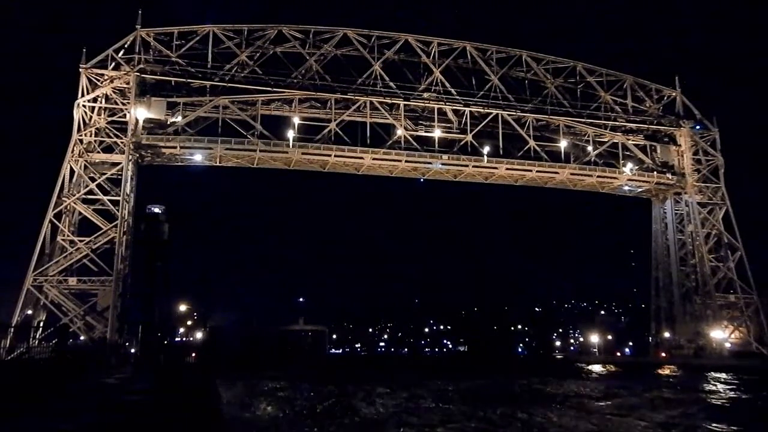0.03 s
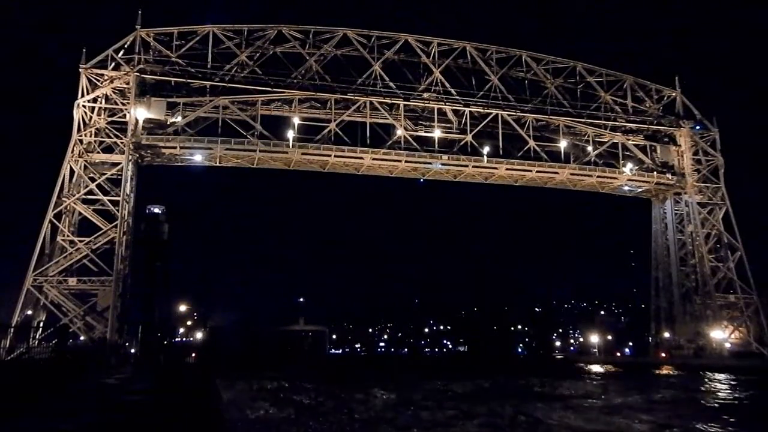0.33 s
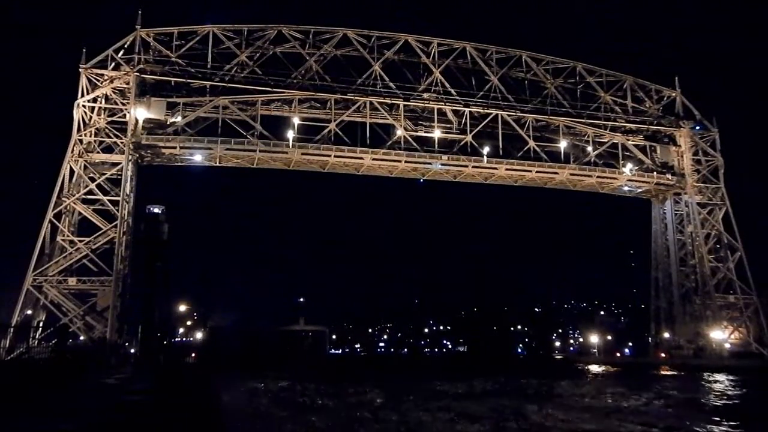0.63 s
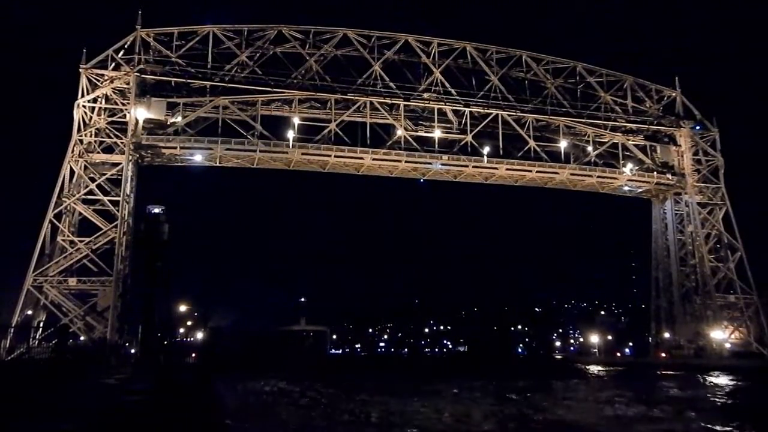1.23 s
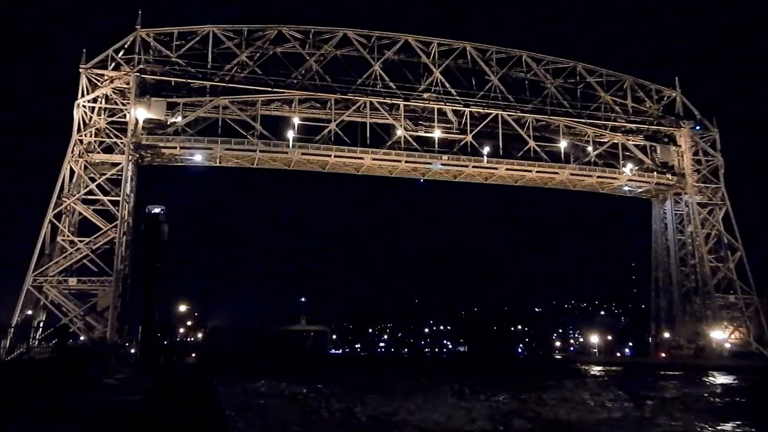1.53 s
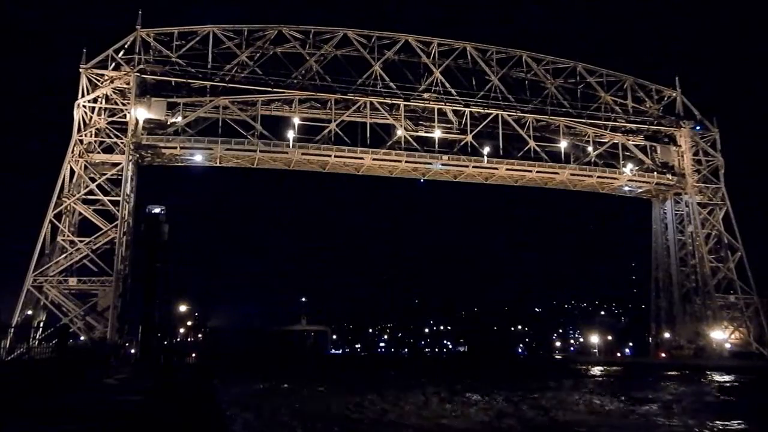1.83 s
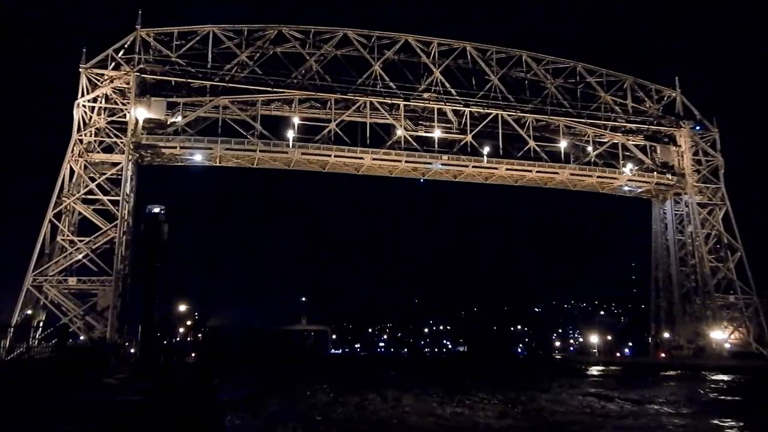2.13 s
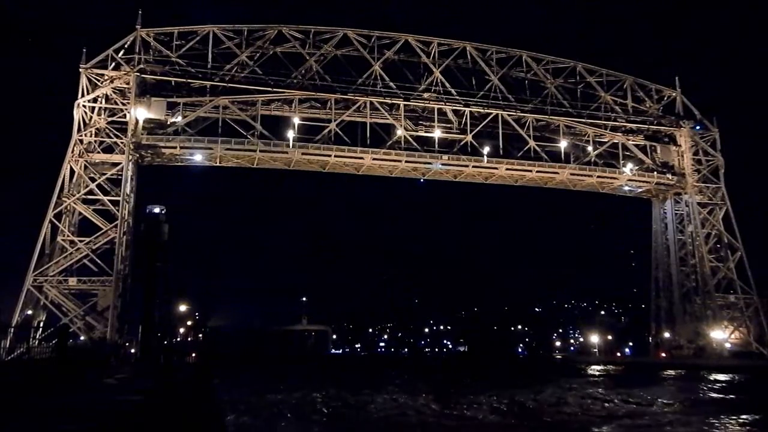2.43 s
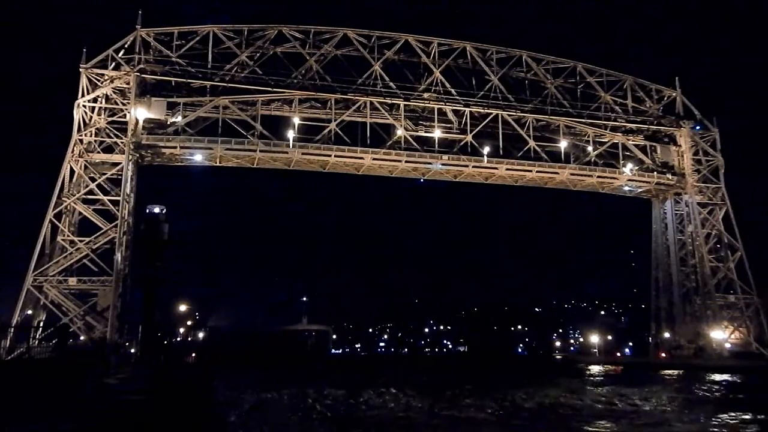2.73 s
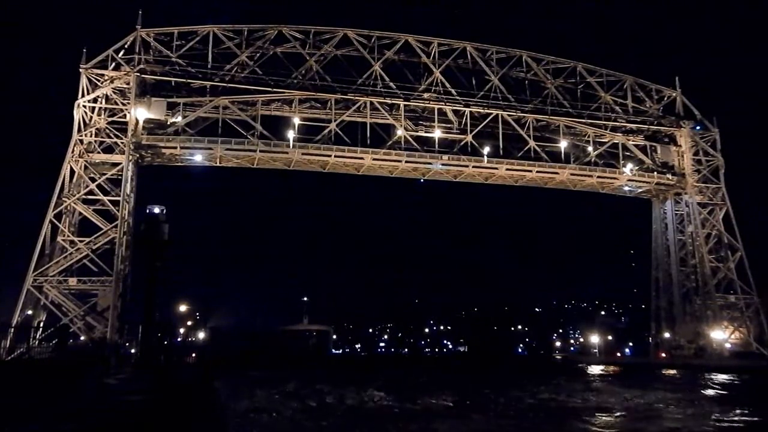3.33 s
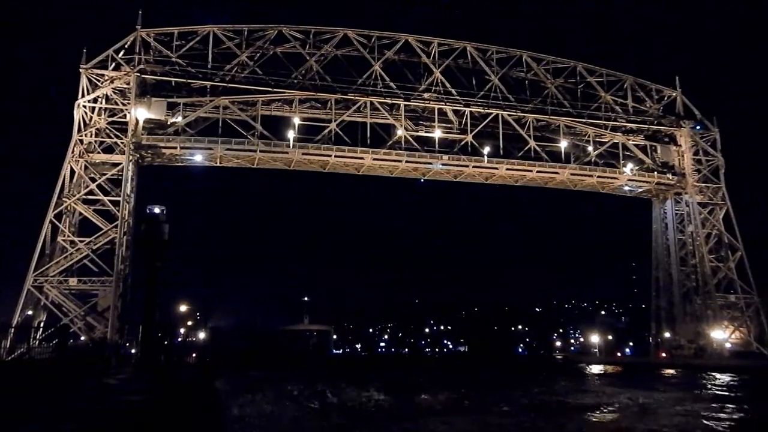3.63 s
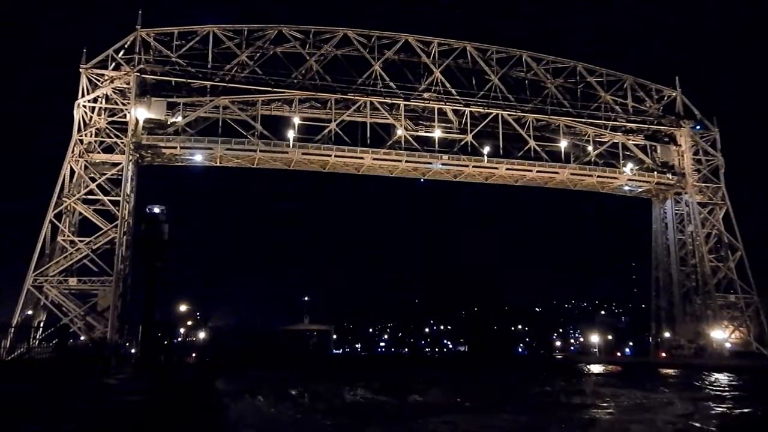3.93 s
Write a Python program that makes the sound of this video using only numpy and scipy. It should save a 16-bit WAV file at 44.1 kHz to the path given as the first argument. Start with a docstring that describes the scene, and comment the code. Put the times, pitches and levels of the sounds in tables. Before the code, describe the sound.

A ship's low, brassy horn stops, echoes over washing harbour water, and sounds again.

```python
"""A ship's deep horn is already blowing over a harbour at night, with engines rumbling underneath.
Its sound arrives by several shifting paths, so its overtones swell and fade, and the shore echoes it.
At 2.7 seconds the horn stops, and a few of its tones come back late from across the water.
In the pause, water washes and slaps against the pier and throws up light spray.
Just before the end, at 3.8 seconds, the horn starts again."""
import sys
import numpy as np
from scipy import signal
from scipy.fft import rfft, irfft
from scipy.io import wavfile
from scipy.ndimage import uniform_filter1d, minimum_filter1d

SR = 44100
rng = np.random.default_rng(int(sys.argv[2]) if len(sys.argv) > 2 else 0)


def wav_record(signal):
    """Record a signal, one row per channel, as 16-bit PCM in the file named by sys.argv[1]."""
    frames = np.transpose(np.atleast_2d(signal))
    bounded = np.clip(frames, -1, 1)
    # unit amplitude maps onto the largest positive 16-bit level
    quanta = np.round(bounded * 32767).astype(np.int16)
    wavfile.write(sys.argv[1], SR, quanta)


N = 176400  # 4 seconds
TIME = np.arange(N) / SR


def amp(db):
    """Turns decibels into a number to multiply by."""
    return 10 ** (np.asarray(db) / 20)


def unit(x):
    """Scales a signal so that its average power is 1."""
    return x / np.sqrt(np.mean(abs(x) ** 2) + 1e-20)


def at_frequency(points, hz):
    """Looks up a frequency in a table, blending between rows on a logarithmic scale."""
    row_hz, value = np.transpose(points)
    return np.interp(np.log(hz + 1), np.log(row_hz), value)


def loudness(points):
    """Turns rows of seconds and dB into a gain for every sample."""
    return amp(np.interp(TIME, *np.transpose(points)))


def drift(per_s, size=2048):
    """A smooth random wobble, with up to about per_s swings a second."""
    hz = np.fft.rfftfreq(size, 2 * N / SR / size)
    slow = irfft(rfft(rng.standard_normal(size)) / np.sqrt(1 + (hz / per_s) ** 6))
    return np.interp(np.arange(N) * size / (2 * N), np.arange(size), unit(slow))


# Each row: frequency in Hz, how alike left and right are (1 means the same).
STEREO_LIKENESS = [(60, 0.81), (500, 0.87), (1800, 0.98), (3000, 0.71), (12000, 0.45)]


def noise(spectrum):
    """Stereo noise shaped by rows of Hz and dB, mostly alike in both ears."""
    hz = np.fft.rfftfreq(N, 1 / SR)
    left, other = rfft(rng.standard_normal((2, N)))
    alike = np.clip(at_frequency(STEREO_LIKENESS, hz), -1, 1)
    right = alike * left + np.sqrt(1 - alike ** 2) * other
    return unit(irfft(np.array([left, right]) * amp(at_frequency(spectrum, hz)), N))


HORN_HZ = 93.63  # the horn's note; its harmonics are whole multiples of this
# Harmonics 2 to 15. Each row: middle level in the first blast in dB, swing in dB, time of a crest in
# seconds, seconds between crests, strength of a second path from 0 to 1, a time when that path cancels
# most in seconds, seconds between such dips, level in the second blast in dB.
LOW_HARMONICS = [(-17.3, 4.5, 2.38, 5.4, .25, 1.5, 1.26, -28), (-14.9, 7.5, .6, 5.9, .08, 2.55, .56, -12),
                 (-19, 4.2, 2.59, 3.8, .22, 1.79, 1.1, -17), (-23.5, 10, .35, 2.75, .2, 1.55, 1.3, -28),
                 (-26, 6.5, 2.55, 3.6, .25, 1.5, 1.2, -25.5), (-29, 3, .7, 3.5, .55, 1.45, .85, -26),
                 (-31, 5.6, 1.03, 1.31, .75, 1.19, 1.04, -29), (-27.5, 5.9, 2.21, 2.95, .4, 1.35, .47, -13),
                 (-28.8, 4, 2.5, 3.6, .78, 1.39, .5, -22.5), (-28.8, 5.6, 1.09, 1.32, .43, 1.23, .9, -27),
                 (-27.6, 5.7, 1.9, 2.01, .78, 1.06, .42, -23), (-25.3, 2.5, 2.4, 2.2, .7, 1.47, 1.15, -20),
                 (-30, 2.5, 2.6, 3, .65, 1.3, .335, -23), (-29, 3, 2.1, 3.85, .4, 1.14, .49, -31)]
# The brassy harmonics above those. Each row: frequency in Hz, dB added to the treble level.
TREBLE_SPECTRUM = [(1300, -6.5), (1700, -8), (2000, -7.5), (2300, -10.5), (2650, -18.5), (3000, -19),
                   (3400, -26), (3800, -26), (4300, -41), (4800, -37.5), (5500, -50.5), (6500, -58.5)]
# How loud that treble is. Each row: time in seconds, level in dB.
TREBLE_LEVEL = [(0, -24), (.44, -23), (.87, -24), (.96, -20), (1.02, -23.5), (1.5, -21.5), (1.8, -21),
                (2.03, -19), (2.15, -21), (2.45, -19), (2.7, -18.5), (3.82, -22.5), (3.87, -19.5),
                (3.9, -13.5), (4, -19)]
# Brief swells and fades of one band. Each row: time in seconds, frequency in Hz, change in dB,
# half-length in seconds.
SURGES = [(.06, 2890, 6, .06), (1.5, 2950, 3.5, .13), (1.46, 1130, -7, .06), (1.46, 490, -8, .08),
          (1.68, 1955, 5, .12), (2.27, 1840, 6, .056), (2.47, 1340, 7, .08), (3.83, 470, 4, .04),
          (3.83, 3100, 7, .03)]
SURGE_WIDTH_HZ = 156


def harmonic_strength(t, treble, bright_db, first_blast, harmonic):
    """Strength of one harmonic; in the first blast, low overtones swell and beat with a second path."""
    if harmonic == 1:
        return amp(-31)
    hz = harmonic * HORN_HZ
    surge_db = sum(db * np.exp(-((hz - band_hz) / SURGE_WIDTH_HZ) ** 2 - ((t - when) / length) ** 2)
                   for when, band_hz, db, length in SURGES if abs(hz - band_hz) < 2 * SURGE_WIDTH_HZ)
    if harmonic - 2 >= len(LOW_HARMONICS):
        return treble * amp(surge_db + at_frequency(TREBLE_SPECTRUM, hz) + bright_db * hz / 1000)
    mean_db, swing_db, crest, period, depth, dip, beat_s, second_db = LOW_HARMONICS[harmonic - 2]
    if not first_blast:
        return amp(surge_db + second_db)
    swell_db = swing_db * np.cos(2 * np.pi * (t - crest) / period)
    beat = 1 - depth * np.exp(2j * np.pi * (t - dip) / beat_s)
    return beat * amp(surge_db + mean_db + swell_db)


def air_paths(t, delays, hz):
    """Late copies of a tone, carried by moving air, add to the direct sound or cancel it."""
    arrivals = np.exp(-2j * np.pi * hz * delays[:, ::100]).sum(0)
    return unit(1 + np.interp(t, t[::100], arrivals) / np.sqrt(len(delays)))


# Stereo spread of the microphones: the treble sounds wider than the bass.
# Each row: frequency in Hz, phase gap between left and right in radians.
STEREO_PHASE = [(1900, 0.067), (2350, .15), (2700, 1), (3700, 1.9), (4300, 0.82), (6500, .7)]
PITCH_WAVER, SAG_HZ_PER_S = .0004, 30
ATTACK_S, BASS_ATTACK_S, BASS_BELOW_HZ, RELEASE_S = .034, .13, 420, .055
PATH_SPREAD_S, WANDER_S, WANDER_PER_S = .009, .0003, 1.55  # side paths and how their delays wander
FLUTTER, FLUTTER_PER_S = .07, 27  # quick shimmer, strongest in the treble
START_ROUGH, START_ROUGH_S = .35, .26  # roughness while the horn starts to speak
STOP_ROUGH, STOP_ROUGH_S = .9, .03  # the diaphragm sputters as the air runs out
HANG_DB, HANG_S = -9, .165  # near reflections briefly hold the full pitch after the valve shuts
SMEAR_RAD, DISPERSION_RAD = 1.0, .12  # phase shifts that spread each pulse out on its way


def blast(start, stop, bright_db, first_blast, paths=4):
    """One blast of harmonics: the treble speaks first, and the pitch sags as the air is shut off."""
    on = (TIME > start) & (TIME - stop < .3)
    t = TIME[on]
    age, since_stop = t - start, np.maximum(t - stop, 0)
    pitch_hz = HORN_HZ * (1 + PITCH_WAVER * drift(8.5))
    phase = 2 * np.pi * np.cumsum(pitch_hz)[on] / SR
    delays = np.array([PATH_SPREAD_S * (path + rng.random()) / paths + WANDER_S * drift(WANDER_PER_S)[on]
                       for path in range(paths)])
    flutter, treble = drift(FLUTTER_PER_S)[on], loudness(TREBLE_LEVEL)[on]
    rough = FLUTTER + START_ROUGH * np.exp(-age / START_ROUGH_S)
    rough += STOP_ROUGH * np.minimum(since_stop / STOP_ROUGH_S, 1)
    release = np.exp(-(since_stop / RELEASE_S) ** 2)
    sag_phase = np.pi * SAG_HZ_PER_S * since_stop ** 2
    hang = amp(HANG_DB) * (1 - release) * np.exp(-(since_stop / HANG_S) ** 4)
    out, smear = np.zeros((2, N)), 0
    for harmonic in range(1, 56):
        hz = harmonic * HORN_HZ
        strength = harmonic_strength(t, treble, bright_db, first_blast, harmonic)
        fading = air_paths(t, delays, hz) if harmonic - 2 >= len(LOW_HARMONICS) else 1
        rise = np.minimum(age / (BASS_ATTACK_S if hz < BASS_BELOW_HZ else ATTACK_S), 1) ** 2
        # Complex numbers carry loudness and phase together; the real part is the sound.
        wobble = .41 * flutter + 1j * drift(FLUTTER_PER_S)[on]
        shimmer = 1 + rough * min(hz / 2000, 1.3) * wobble
        direct = shimmer * release * np.exp(-1j * harmonic * sag_phase)
        smear += SMEAR_RAD * rng.standard_normal()
        tone = np.exp(1j * (harmonic * phase + smear + DISPERSION_RAD * harmonic ** 2))
        wave = strength * fading * rise * (direct + 1j * hang) * tone
        stereo_turn = np.exp(.5j * at_frequency(STEREO_PHASE, hz) * rng.choice([-1, 1]))
        out[:, on] += [(wave * stereo_turn).real, (wave / stereo_turn).real]
    return out


# Each row: time the valve opens in seconds, time it shuts in seconds, extra treble in dB per kHz.
BLASTS = [(-.3, 2.702, 0), (3.79, 4.3, 0.84)]


def ship_horn():
    """The horn sounds each time its air valve opens."""
    blasts = sum(blast(*row, first_blast=i == 0) for i, row in enumerate(BLASTS))
    fade_in = np.sin(np.pi / 2 * np.minimum(np.arange(N) / 200, 1)) ** 2
    return blasts * fade_in


# Separate echoes. Each row: delay in seconds, level in dB.
ECHOES = [(.062, -19), (0.126, -15.5), (.19, -20.5), (0.289, -16.5)]
# How long the tail rings. Each row: frequency in Hz, seconds to fade by 60 dB.
TAIL_FADE = [(100, 1.5), (300, 2.0), (700, 4), (2000, 2.5), (3000, 0.2), (6000, .8)]
# The tail's tone colour. Each row: frequency in Hz, level in dB.
TAIL_SPECTRUM = [(190, -16), (380, -21), (520, -13), (650, -11), (1100, -13), (1400, -13), (2000, -9.5),
                 (3000, -13.5)]


def shore_echoes(sound):
    """The shore throws the sound back as a few clear echoes and a long, blurred tail."""
    hiss = rng.standard_normal((3, 2 * SR))
    hz, t, bands = signal.stft(hiss[0] + .18 * hiss[1:], SR, nperseg=256)
    fade_s = at_frequency(TAIL_FADE, hz)[:, None]
    bands = bands * amp(at_frequency(TAIL_SPECTRUM, hz)[:, None] - 60 * t / fade_s)
    bands /= np.sqrt(SR * fade_s / np.log(1e6))  # ringing longer adds no energy
    response = signal.istft(bands, SR, nperseg=256)[1]
    soft_pulse = np.hanning(15) / 7  # dulls each echo
    for delay, db in ECHOES:
        first = round(delay * SR)
        response[:, first:first + 15] += amp(db) * soft_pulse
    return signal.fftconvolve(sound, response, axes=1)[:, :N]


# The engines' tone colour. Each row: frequency in Hz, relative level in dB.
ENGINE_SPECTRUM = [(20, -36), (35, -25), (55, -5), (85, -1), (120, -12.5), (200, -1), (400, -41.5),
                   (900, -89)]
# Each row: time in seconds, level in dB.
ENGINE_LEVEL = [(0, -20.5), (.15, -23.5), (.25, -30), (2, -28), (2.55, -28.5), (2.7, -35.5), (3.1, -31),
                (3.55, -28.5), (3.7, -42), (4, -30)]


def engines():
    """Engines make a low rumble that rises and falls."""
    return noise(ENGINE_SPECTRUM) * loudness(ENGINE_LEVEL)


# The moving water's tone colour. Each row: frequency in Hz, relative level in dB.
WASH_SPECTRUM = [(30, -20.5), (80, -8), (160, -4.5), (280, -1.5), (450, -6.5), (800, -10.5), (1500, -14),
                 (2300, -15.5), (2900, -23), (3700, -25), (4700, -30), (6300, -31.5), (8000, -45),
                 (9500, -51.5), (10500, -61)]
# Each row: time in seconds, level in dB.
WASH_LEVEL = [(0, -27.5), (.25, -33.5), (1.4, -33), (2.6, -27.5), (2.9, -28.5), (3.15, -23.2), (3.5, -23.2),
              (3.62, -22.8), (3.76, -27), (4, -25)]


def water_wash():
    """Water washes unevenly against the pier."""
    return noise(WASH_SPECTRUM) * loudness(WASH_LEVEL) * amp(1.2 * drift(25))


# Each row: start in seconds, level in dB, fade time in seconds, starting pitch of the trapped air in Hz.
SLAPS = [(.04, -15, .014, 75), (1.972, -18, .012, 110), (3.128, -13, .015, 195), (3.155, -21, .028, 265),
         (3.243, -21, .016, 620), (3.272, -20, .022, 124), (3.35, -15, .01, 370), (3.373, -13.5, .008, 180),
         (3.446, -14, .022, 125), (3.502, -22, .012, 620), (3.51, -18, .012, 340), (3.555, -18, .0084, 169),
         (3.679, -14.5, .0098, 210), (3.96, -16, .012, 290)]
# The noisy part of a slap. Each row: frequency in Hz, relative level in dB.
SLAP_SPECTRUM = [(40, -22), (120, 3), (250, 1.5), (420, -6.5), (700, -8), (1200, -26), (3000, -31),
                 (7000, -39), (12000, -75)]
SLAP_RISE_S, GLIDE_PER_S = .005, 7  # the glide is in multiples of the starting pitch


def water_slaps():
    """Each hollow slap churns the water and rings a pocket of trapped air, whose pitch climbs."""
    out, churn = np.zeros((2, N)), noise(SLAP_SPECTRUM)
    for start, db, fade_s, hz in SLAPS:
        age = np.maximum(TIME - start, 0)
        thump = np.sin(2 * np.pi * hz * age * (1 + GLIDE_PER_S * age / 2))
        rise = np.minimum(age / SLAP_RISE_S, 1)
        fall = np.exp(-np.maximum(age - SLAP_RISE_S, 0) / fade_s)
        out += amp(db) * rise * fall * (.68 * churn + .86 * thump)
    return out


# Each row: time in seconds, level in dB.
CLICKS = [(.168, -32)]


def click(fade_s=.0005):
    """A tiny burst of noise makes a brief click, like a peak clipping."""
    envelope = sum(amp(db) * np.exp(-abs(TIME - when) / fade_s) for when, db in CLICKS)
    return rng.standard_normal(N) * envelope


# Each row: pitch in Hz, level in dB, loudest moment in seconds.
LATE_TONES = [(656, -30.5, 3.0), (1124, -31, 2.92), (937, -36, 3.3)]


def far_shore(half_length_s=.17):
    """A few of the horn's tones come back late from across the water and hang in the pause."""
    out = np.zeros(N)
    for hz, db, crest in LATE_TONES:
        swell = amp(db) * np.exp(-((TIME - crest) / half_length_s) ** 2)
        out += swell * np.sin(2 * np.pi * (hz * TIME + rng.random()))
    return out


# Each row: loudest moment in seconds, level in dB, half-length in seconds.
SPLASHES = [(3.22, -43, .13), (3.381, -30, .006), (3.6, -35, .025)]
# The spray's tone colour. Each row: frequency in Hz, relative level in dB.
SPRAY_SPECTRUM = [(500, -40), (2000, -11), (2900, 6), (4000, -7), (6300, -8), (8500, -24), (11000, -36),
                  (15000, -39)]


def spray():
    """Light splashes of spray make short, bright hisses."""
    envelope = sum(amp(db) * np.exp(-((TIME - when) / length) ** 2) for when, db, length in SPLASHES)
    return noise(SPRAY_SPECTRUM) * envelope


def scene():
    """Adds up the horn, its echoes, the engines, the water and the click."""
    horn = ship_horn()
    echoes = shore_echoes(horn) + far_shore()
    return horn + echoes + engines() + water_wash() + water_slaps() + spray() + click()


# Narrow dips in the microphone's response. Each row: frequency in Hz, width in Hz.
MIC_DIPS = [(2500, 247), (4000, 260), (5000, 90)]
CEILING, LIMITER_S, TREBLE_CUT_HZ = .97, .012, 15500


def record(dry):
    """The microphone dips a few bands, a limiter turns down peaks, and the highest treble is cut."""
    for hz, width in MIC_DIPS:
        dry = signal.lfilter(*signal.iirnotch(hz, hz / width, SR), dry)
    window = int(LIMITER_S * SR)
    safe_gain = CEILING / np.maximum(abs(dry).max(0), CEILING)
    held_gain = minimum_filter1d(safe_gain, 2 * window)
    smooth_gain = uniform_filter1d(uniform_filter1d(held_gain, window), window)
    low_pass = signal.firwin(511, TREBLE_CUT_HZ, window=("kaiser", 9), fs=SR)
    return signal.oaconvolve(dry * smooth_gain, low_pass[None], "same")


dry = scene()
out = record(dry)
wav_record(out)
```